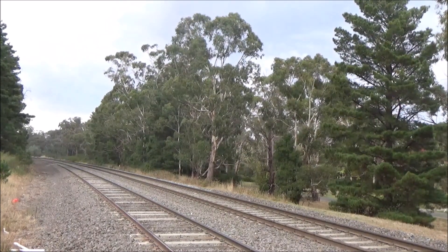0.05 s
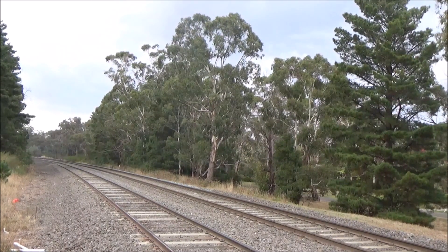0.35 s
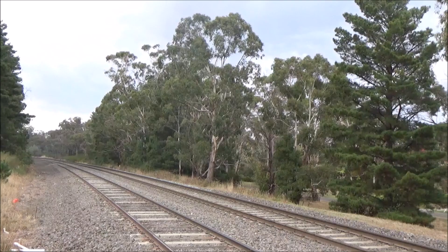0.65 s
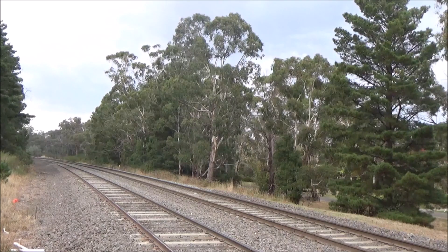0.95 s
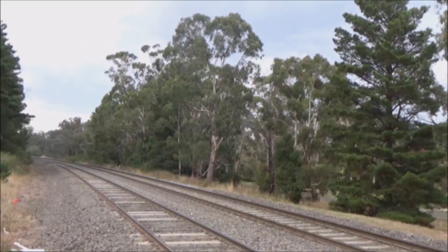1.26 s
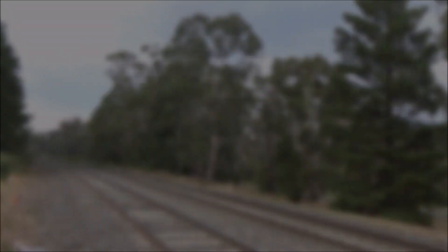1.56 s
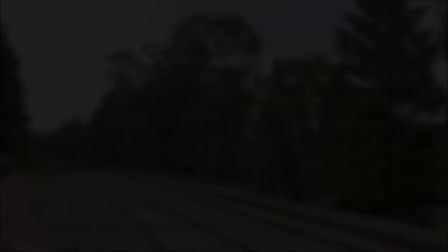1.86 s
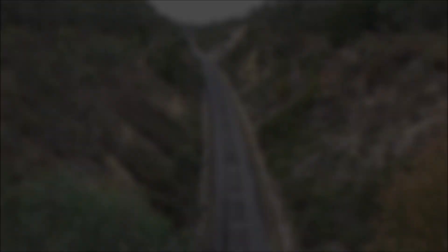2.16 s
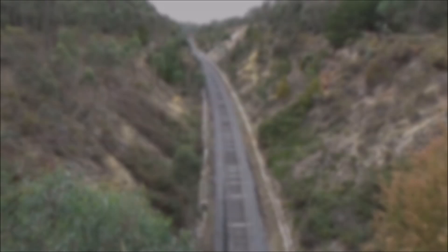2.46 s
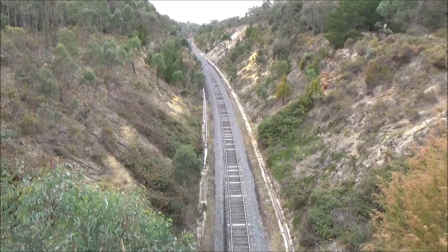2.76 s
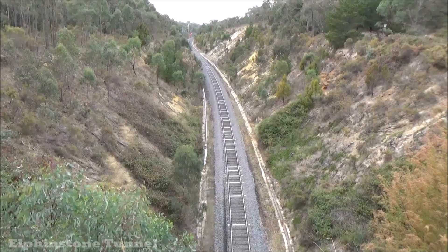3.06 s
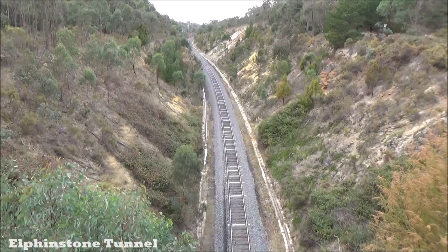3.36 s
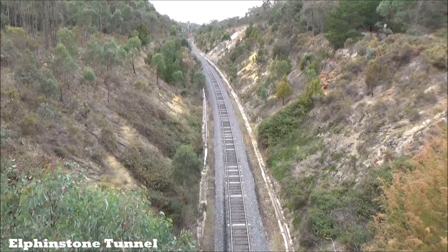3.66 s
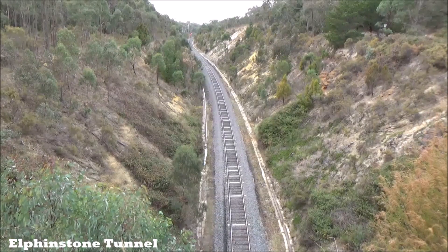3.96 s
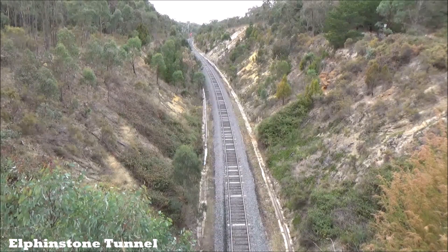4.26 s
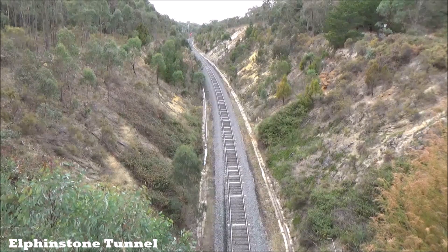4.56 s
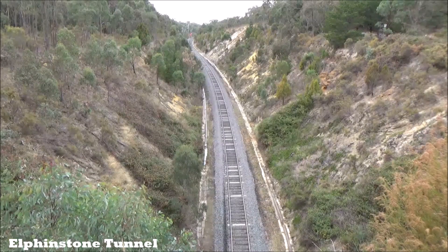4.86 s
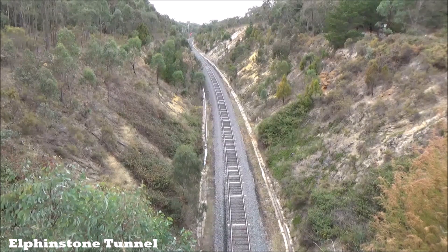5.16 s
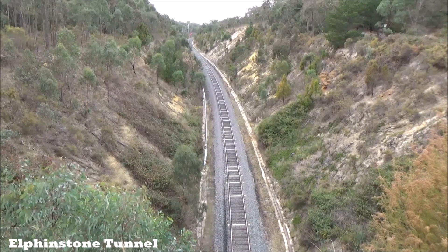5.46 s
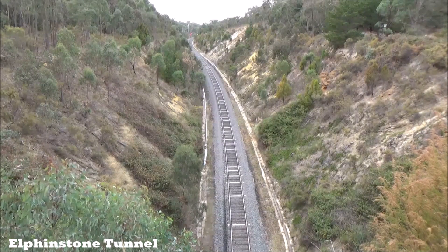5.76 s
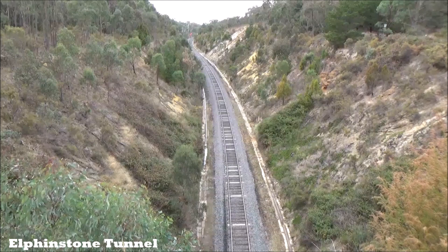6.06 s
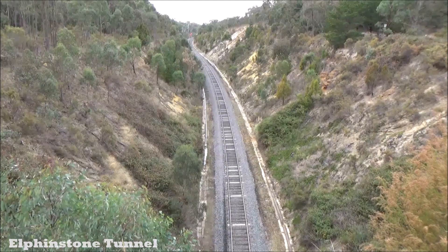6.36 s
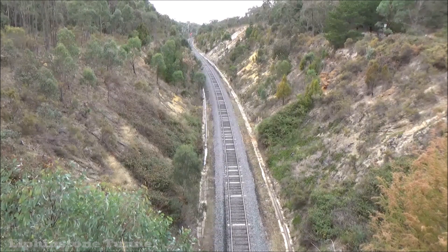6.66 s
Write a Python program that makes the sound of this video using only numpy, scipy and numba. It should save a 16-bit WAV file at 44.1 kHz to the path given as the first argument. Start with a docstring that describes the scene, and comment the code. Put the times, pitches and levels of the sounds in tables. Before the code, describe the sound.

Outdoors beside a railway, carriages rumble off to the right with a rough, pulsing wheel roar and short metallic squeals. They die away after about two seconds, and a falling rush leads into the quieter, quick chuffing of another steam engine, heard from ahead in a cutting. Its echoing beat grows nearer, then holds steady, with falling whines over it. A faint insect, rustling leaves and one thin bird trill lie behind.

```python
"""A steam train rolls away on the right, its rough wheels roaring and ringing under an even beat.
As it fades, a second locomotive works towards a bridge over a deep cutting: quick jets of steam from
the chimney ring hollow, echo off the slopes and are crossed by sinking whines.
Behind them a faint, thin note glides upwards, an insect rasps in the scrub, a small bird trills once
and leaves rustle in the open air."""
import sys
import numpy as np
from scipy import signal
from scipy.fft import rfft, irfft, next_fast_len
from scipy.io import wavfile
from scipy.ndimage import uniform_filter1d
from numba import njit

SR = 44100
rng = np.random.default_rng(int(sys.argv[2]) if len(sys.argv) > 2 else 0)


def int16_out(signal):
    """Quantize to a 16-bit WAV file."""
    q = np.round(np.clip(np.atleast_2d(signal).T, -1, 1) * 32767)
    wavfile.write(sys.argv[1], SR, q.astype(np.int16))


N = 300321
T = np.arange(N) / SR
NEAR_S = 4.58  # from here on the second train's wash and echo hold steady


# Fade of the departing train: time_s, roar_db, rumble_db
DEPARTURE_FADE = [(0, -19.5, -34), (.3, -21.5, -42.5), (.65, -23.5, -42.5), (.9, -23.5, -43.5),
                  (1.1, -25.5, -45.5), (1.36, -32, -50.5), (1.6, -31, -47.5), (1.87, -34.5, -55.5),
                  (2.2, -36.5, -53), (2.6, -37.5, -58)]
# Tone of wheels rolling on rail: freq_hz, gain_db
ROLLING_EQ = [(300, -42), (500, -15.5), (690, -0.6), (950, -10.5), (1100, -4.5), (1700, 1), (2400, -2),
              (3300, -11.5), (3950, -16), (4400, -22), (7000, -30.5), (8500, -38.5), (10500, -42),
              (12000, -77)]
# Ring of the wheels: pitch_hz, width_hz, gain_db
WHEEL_MODES = [(720, 25, -24), (860, 15, -5), (1070, 50, 11), (1550, 25, -17), (1686, 22, -21),
               (2430, 19, 4)]
def wheels(beat_hz=13.24, first_s=.027, steady_db=-4, beat_db=-9.5, beat_db_per_s=3):
    """Rough wheels roar and ring, surging on a beat that stands out more with distance; mid and side."""
    roar_db, _ = curve(DEPARTURE_FADE)
    t = np.arange(SR // 5) / SR - .02
    stroke = puff(t, length_s=.038, rise_s=.0027, fall_s=.038)
    beat_power = np.zeros(N)
    for start_s in np.arange(first_s, DEPARTURE_FADE[-1][0], 1 / beat_hz):
        add(beat_power, (undb(beat_db + beat_db_per_s * start_s) * stroke) ** 2, start_s + t[0])
    force = undb(roar_db) * np.sqrt(undb(steady_db) ** 2 + beat_power)
    roughness = flickering_noise(flicker_db=.8, rate_hz=26)
    contact = reflections(roughness, share_db=-13.5, spread_s=.04) * undb(.5 * walk(260))
    return (colour(contact, ROLLING_EQ) + undb(-21.5) * ring(contact, WHEEL_MODES)) * force


# Squeals of wheel on rail: peak_s, length_s, pitch_hz, glide_hz_per_s, waver_hz, level_db
SQUEALS = [(0.078, .11, 1520, 1500, 70, -34), (0.28, 0.15, 1946, 0, 110, -28),
           (.3, .16, 1665, -1100, 55, -24.5), (0.373, 0.055, 2580, 2996, 59, -31),
           (.44, 0.056, 2970, 1204, 50, -33.5), (0.537, 0.23, 3420, 1.5, 80, -39.5),
           (0.542, 0.39, 700, 0, 80, -37.5), (0.88, 0.16, 1850, -900, 70, -32.5),
           (1.0, .14, 1620, 0, 60, -33.5), (1.1, .14, 2170, -500, 40, -32),
           (1.27, .16, 2180, 400, 40, -32.5), (1.26, .12, 1923, 1, 70, -36), (1.5, .14, 3410, 400, 80, -51),
           (1.68, 0.15, 2735, -1500, 170, -42.5)]
def flanges(flutter_db=3):
    """Now and then a wheel rubs the rail and one of its modes sings roughly."""
    out = 0
    for peak_s, length_s, pitch_hz, glide_hz_per_s, waver_hz, level_db in SQUEALS:
        glide = glide_hz_per_s * np.clip(T - peak_s, -length_s, length_s)
        squeal = sine(pitch_hz + glide + waver_hz * walk(300)) * undb(flutter_db * walk(150))
        swell = np.exp(-np.minimum((2 * (T - peak_s) / length_s) ** 2, 50))
        out = out + unit(squeal) * swell * undb(level_db)
    return out


# Low body of the carriages: freq_hz, gain_db
RUMBLE_EQ = [(25, -39), (60, -18), (110, -11.5), (170, -1.5), (240, 1.5), (300, 4), (400, -3), (550, -5.5),
             (1000, -30.5)]
def carriages():
    """The carriages rumble and fade as they roll off; mid and side."""
    _, rumble_db = curve(DEPARTURE_FADE)
    return colour(rng.standard_normal((2, N)), RUMBLE_EQ) * undb(rumble_db + .95 * walk(18))


# Partials of a thin, high whine: pitch_hz, width_hz, gain_db
HIGH_WHINE_MODES = [(7150, 35, -1), (7400, 45, 0), (7492, 35, -2), (9320, 80, -3), (9470, 90, -3),
                    (9680, 80, -4), (10155, 50, -6)]
def high_whine(start_db=-59, fall_db_per_s=4):
    """A thin, high whine of fixed pitch that slowly fades."""
    whine = ring(rng.standard_normal(N), HIGH_WHINE_MODES)
    return whine * undb(start_db - fall_db_per_s * T + 1.2 * walk(14.5))


# Stereo width of the departing train: freq_hz, side_minus_mid_db
DEPARTURE_WIDTH = [(60, -5), (150, -6), (270, -11.5), (410, -4.5), (680, -14), (1130, -7), (2400, -11),
                   (4600, 0), (6300, -3), (9000, -7)]
# Its pan, mostly to the right: freq_hz, left_minus_right_db
DEPARTURE_PAN = [(200, 1), (350, -0.5), (600, -3), (1050, -7), (1900, -5.5), (3200, -6), (4600, -1),
                 (5800, -3), (7400, 4.5), (10300, 0)]
def departing_train():
    """Wheels, carriages and flanges blend into one train off to the right, under a thin, high whine."""
    mid, side = wheels() + carriages()
    train = stereo([mid + flanges() + high_whine(), equalise(side, DEPARTURE_WIDTH)], side_db=0)
    ear_share = np.array([[.5], [-.5]])
    return shape(train, lambda f: undb(across(DEPARTURE_PAN, f) * ear_share))


# Thuds of the running gear: start_s, level_db, pitch_hz, side_minus_mid_db
KNOCKS = [(0.005, -48, 105, -9), (0.135, -52, 105, -6), (0.218, -40, 150, -7), (0.81, -52, 135, -9),
          (1.655, -51, 190, -14), (2.042, -51, 155, -6), (2.345, -59, 100, -9), (3.424, -54, 180, -26)]
def knocks():
    """Heavy blows in the running gear reach the ear only as short low thuds."""
    out, t = np.zeros((2, N)), np.arange(SR // 2) / SR - .03
    blow = puff(t, length_s=.03, rise_s=.006, fall_s=.012)
    for start_s, level_db, pitch_hz, side_db in KNOCKS:
        thud = stereo(noise_band(len(t), pitch_hz, half_width_hz=50), side_db) * blow * undb(level_db)
        for ear, channel in zip(out, thud):
            add(ear, channel, start_s + t[0])
    return out


# Drive of the second engine's exhaust while far off: time_s, relative_level_db, brightness_db
FAR_EFFORT = [(2.38, -42.5, -3), (2.7, -44, -2), (3.05, -41, 1.5), (3.6, -41, -1), (3.9, -38.5, -7.5),
              (4.1, -40, -7)]
# Its chuffs once near: start_s, relative_level_db, brightness_db, bark_0_to_1
NEAR_CHUFFS = [(4.17, -39.8, -4.5, 0.9), (4.243, -38.5, -3.4, 0.2), (4.316, -38.6, -3.0, 0.2),
               (4.392, -36.8, -4.6, 0.2), (4.469, -38.0, -4.0, 0.2), (4.543, -34.2, -5.0, 0.7),
               (4.614, -34.5, -3.0, 0.2), (4.687, -37.0, -0.6, 0.2), (4.768, -35.1, -3.4, 0.2),
               (4.842, -33.2, -0.8, 0.9), (4.911, -35.4, -2.1, 0.8), (4.986, -35.4, -3.7, 0.2),
               (5.065, -35.3, 1.5, 0.5), (5.14, -33.0, 2.0, 0.9), (5.213, -35.9, 2.2, 0.2),
               (5.285, -35.6, -0.3, 0.2), (5.363, -34.6, 0.5, 0.8), (5.438, -35.6, 2.4, 0.2),
               (5.508, -37.6, 4.0, 0.2), (5.591, -36.6, 3.8, 0.2), (5.657, -36.5, 2.9, 0.2),
               (5.736, -37.3, 2.7, 0.2), (5.808, -35.0, 3.5, 0.8), (5.882, -37.8, 3.7, 0.2),
               (5.958, -36.6, 1.4, 0.2), (6.035, -35.5, 1.9, 0.2), (6.108, -38.1, 2.2, 0.2),
               (6.182, -38.3, 2.7, 0.2), (6.255, -36.9, -1.0, 0.2), (6.331, -36.6, 4.0, 0.5),
               (6.399, -36.8, 1.1, 0.2), (6.48, -36.9, 3.0, 0.2), (6.553, -36.8, 1.0, 0.2),
               (6.625, -37.4, 4.0, 0.2), (6.708, -38.5, 2.9, 0.2), (6.777, -38.5, 1.3, 0.9)]
def chuffs(t, beat_hz=13.425, first_s=2.381, scatter_s=.002, scatter_db=.9, crack_db=5, crack_s=.008):
    """The valve lets out steam on an even beat; yields start_s, steam flow over t, brightness_db."""
    time_s, effort_db, tint_db = np.transpose(FAR_EFFORT)
    far_chuffs = []
    for beat_s in np.arange(first_s, NEAR_CHUFFS[0][0] - .5 / beat_hz, 1 / beat_hz):
        start_s = beat_s + scatter_s * rng.standard_normal()
        level_db = np.interp(beat_s, time_s, effort_db) + scatter_db * rng.standard_normal()
        far_chuffs.append((start_s, level_db, np.interp(beat_s, time_s, tint_db), 0))
    for start_s, level_db, brightness_db, bark in far_chuffs + list(NEAR_CHUFFS):
        # a bark is shorter and snappier, and opens with a crack that dies at once
        flow = puff(t, length_s=.044 - .014 * bark, rise_s=.005 * .2 ** bark, fall_s=.02)
        overshoot_db = bark * crack_db * np.exp(-abs(t) / crack_s)
        yield start_s, flow * undb(level_db + overshoot_db), brightness_db


# Tone of the chimney blast: freq_hz, gain_db
BLAST_EQ = [(150, -35), (270, -23), (380, -2), (620, -11.5), (800, -1.5), (1450, 1.5), (2200, -2),
            (3300, -6), (4700, -15.5), (5800, -29.5), (8000, -64)]
# Stereo width of the cutting's echo: freq_hz, side_minus_mid_db
ECHO_WIDTH = [(150, -2), (390, -25), (560, -11), (1400, -6.5), (2300, -5), (5000, -7)]
def exhaust(crackle_db=.33, near_echo_db=-8.5, drying_db_per_s=2.5, trim_db=-4):
    """Each chuff is a ragged jet of steam that echoes off the slopes, drier as the engine nears."""
    jets, t = np.zeros(N), np.arange(SR // 5) / SR - .02
    for start_s, flow, brightness_db in chuffs(t):
        tone = lambda f: undb(across(BLAST_EQ, f) + brightness_db * np.clip(np.log2((f + 1) / 1600), 0, 1))
        steam = unit(shape(rng.standard_normal(len(t)), tone))
        add(jets, steam * flow, start_s + t[0])
    jets *= undb(crackle_db * walk(420) + walk(75))
    front, side = slope_echo(jets, t60_s=.7, build_s=.04)
    echo = stereo([front, equalise(side, ECHO_WIDTH)], side_db=0)
    wet = undb(near_echo_db + drying_db_per_s * np.maximum(NEAR_S - T, 0))
    direct = reflections(jets, share_db=-11, spread_s=.02)
    return undb(trim_db) * (direct + wet * echo) / np.sqrt(1 + wet ** 2)


# Tone of the second train's wash: freq_hz, gain_db
WASH_EQ = [(200, -22), (330, -5), (500, -5.5), (630, -1.5), (780, -2.5), (1500, 1.5), (2100, -3.5),
           (3100, -9.5), (4500, -18.5), (5700, -32), (9000, -33.5), (11000, -36.5)]
# Drone of its engine: pitch_hz, width_hz, gain_db
DRONE_MODES = [(58, 32, -12), (208, 67, -0.5), (326, 71, -4.5), (390.7, 39, 0.5), (486, 32, -6.5),
               (752, 41, -4), (855, 34, -4.5)]
def approaching_train(wash_rise_db_per_s=2.5, drone_fall_db_per_s=.4):
    """Wheels and old echoes merge to a wash that grows as the train nears; the engine drones low."""
    wash_db = -43.5 - wash_rise_db_per_s * np.maximum(NEAR_S - T, 0)
    drone_db = -51.5 - drone_fall_db_per_s * (T - NEAR_S)
    wash = stereo(colour(flickering_noise(flicker_db=1.2, rate_hz=9), WASH_EQ), side_db=-18)
    hum = ring(rng.standard_normal(N), DRONE_MODES)
    drone = colour(hum, [(30, -18), (60, -3.5), (800, 5), (1400, -17)])
    return wash * undb(wash_db) + drone * undb(drone_db + .33 * walk(12))


# Hollow ring of engine and cutting: pitch_hz, width_hz, lift_db
HOLLOW_MODES = [(385, 54, 0.5), (744, 55, 3), (840, 50, 3), (1060, 55, 2.5), (1164, 50, 1.5),
                (1520, 120, 1), (1900, 80, 2), (2830, 80, 3), (3110, 120, 2.5), (3470, 120, 1.5),
                (3920, 100, 2.5)]
def hollow(pair):
    """Engine and cutting lift the second train's roar at a row of fixed resonances."""
    def lift(f):
        return sum((undb(db) - 1) * resonance(f, hz, width) for hz, width, db in HOLLOW_MODES)
    return shape(pair, lambda f: 1 + lift(f))


# Sinking whines, one list of points each: time_s, pitch_hz, lift_db
WHINE_PATHS = [
    [(2.45, 4000, 4.5), (2.57, 3800, 4.5)],
    [(2.47, 1850, 6), (2.62, 1780, 6)],
    [(2.72, 3080, 4), (2.8, 2780, 6), (2.85, 2380, 6.5), (2.94, 1980, 3.5), (3.08, 1780, 4.5),
     (3.25, 1540, 4), (3.37, 1320, 6), (3.46, 1250, 2)],
    [(2.97, 3500, 4.5), (3.03, 3250, 4), (3.1, 2900, 4.5)],
    [(4.17, 1540, 3), (4.33, 1445, 7), (4.42, 1400, 2), (4.5, 1190, 1), (4.56, 1125, 5.5), (4.62, 1080, 1)],
    [(4.75, 1590, 4), (4.86, 1520, 4.5), (4.92, 1420, 7.5), (5.0, 1490, 8), (5.05, 1380, 3)],
    [(5.05, 2550, 6), (5.13, 1850, 3), (5.18, 1720, 3), (5.24, 1680, 8), (5.31, 1560, 4), (5.4, 1100, 3)],
    [(5.92, 2100, 3), (5.98, 2020, 6), (6.09, 1990, 7), (6.14, 1600, 6), (6.22, 1540, 4)],
    [(6.33, 2420, 3), (6.46, 2330, 4.5), (6.6, 2250, 1.5)],
]
def whines(pair, waver_share=.028, breakup=.45):
    """Dead centre, bands of the roar swell into hoarse whines, as when sound and reflection add up."""
    mid, out = pair.mean(axis=0), pair
    for path in WHINE_PATHS:
        path_hz, lift_db = curve(path)
        pitch_hz = path_hz * (1 + waver_share * walk(70))
        mean_hz = np.mean([point[1] for point in path])
        width_hz = 250 * (mean_hz / 1500) ** 1.5  # higher whines are wider
        sounding = (T > path[0][0]) & (T < path[-1][0])
        gate = uniform_filter1d(sounding.astype(float), SR // 40)
        broken = np.clip(1 + breakup * walk(30), 0, 1.3)
        band = sweep(sweep(mid, pitch_hz, width_hz), pitch_hz, width_hz)
        out = out + (undb(lift_db) - 1) * gate * broken * band
    return out


# Falling rush between the trains: time_s, centre_hz, level_db
SWISH_PATH = [(2.1, 1030, -55), (2.5, 1010, -48.5), (2.88, 850, -47.5), (3.1, 775, -48.5), (3.4, 670, -67),
              (4.2, 580, -100)]
def swish(width_hz=600.):
    """A hollow rush sinks in pitch as the second train comes into earshot."""
    centre_hz, level_db = curve(SWISH_PATH)
    rush = [unit(sweep(sweep(noise, centre_hz, width_hz), centre_hz, width_hz))
            for noise in rng.standard_normal((2, N))]
    return stereo(rush, side_db=-9.5) * undb(level_db)


def bird_trill(start_s=4.505, centre_hz=6740, swing_hz=240, warble_hz=37, gap_hz=680, level_db=-63):
    """A thin, quickly warbled trill from both sides of the syrinx, with its echo."""
    pitch_hz = centre_hz + swing_hz * np.sin(2 * np.pi * warble_hz * T) + 130 * walk(150)
    voices = sine(pitch_hz) + undb(-4) * sine(pitch_hz + gap_hz)
    breath = puff(T - start_s, length_s=.25, rise_s=.01, fall_s=.01)
    call = voices * breath * undb(level_db + 2.5 * walk(90))
    return call + undb(-6) * slope_echo(call, t60_s=.15, build_s=.005)


def rising_note(start_s=3.03, length_s=.27, start_hz=5750, glide_hz_per_s=4400, level_db=-71.5):
    """A faint, thin note glides upwards, wavering, with a short echo."""
    pitch_hz = start_hz + glide_hz_per_s * np.clip(T - start_s, 0, length_s) + 95 * walk(200)
    envelope = puff(T - start_s, length_s, rise_s=.01, fall_s=.01)
    note = sine(pitch_hz) * envelope * undb(level_db + 2.5 * walk(50))
    return note + undb(-8) * slope_echo(note, t60_s=.12, build_s=.005)


# Swells of the insect's song: time_s, level_db
INSECT_BOUTS = [(3.2, -78), (3.9, -70), (4.6, -82), (5.3, -73), (5.8, -71), (6.1, -75), (6.35, -72),
                (6.8, -72)]
def insect(pitch_hz=8170, stroke_hz=16):
    """Wing strokes rasp a narrow high resonance in uneven bouts."""
    wings = .5 + .5 * np.cos(2 * np.pi * stroke_hz * T + 1.3 * walk(5))
    strokes = .3 + .7 * wings ** 2
    rasp = stereo(noise_band(N, pitch_hz, half_width_hz=300), side_db=-13)
    bout_db, = curve(INSECT_BOUTS)
    return rasp * strokes * undb(bout_db + 1.5 * walk(14))


def tick(start_s=2.054, decay_s=.002, level_db=-49):
    """Something small snaps once, dry and close by."""
    t = T - start_s
    snap = colour(rng.standard_normal(N), [(3000, -20), (5500, -2), (8500, -3), (11000, -18)])
    return snap * (t >= 0) * np.exp(-abs(t) / decay_s) * undb(level_db)


# Bed of open air and foliage: freq_hz, gain_db
AIR_EQ = [(20, -26), (60, 0), (120, -5), (400, -5), (2000, -1), (6000, -2), (8300, -6), (10500, -10),
          (12000, -30)]
# Breeze in the near leaves: time_s, level_db
BREEZE = [(2.3, -74), (2.75, -67), (3.15, -67), (3.4, -73.5), (4.5, -73.5)]
def air(bed_db=-73):
    """Quiet open air; the rustle of the near leaves swells briefly in a breeze."""
    bed = stereo(colour(rng.standard_normal((2, N)), AIR_EQ), side_db=-.5) * undb(bed_db)
    leaves = colour(rng.standard_normal((2, N)), [(3000, -9), (6000, -6), (8500, -1.5), (10500, -17)])
    breeze_db, = curve(BREEZE)
    return bed + stereo(leaves, side_db=-3) * undb(breeze_db + 1.2 * walk(25.2))


def slope_echo(x, t60_s, build_s):
    """Rock and scrub scatter the sound into two independent echo tails."""
    t = np.arange(SR) / SR
    tails = rng.standard_normal((2, SR)) * undb(-60 * t / t60_s) * (1 - np.exp(-t / build_s))
    tails /= np.sqrt(np.sum(tails ** 2, axis=1, keepdims=True))
    return signal.fftconvolve(x[None], tails, axes=1)[:, :N]


def reflections(x, share_db, spread_s, count=24):
    """Early echoes from ground and trunks comb the sound finely."""
    lateness, polarity = rng.random((count, 2)).T
    delay_s = .003 + spread_s * lateness
    taps = np.zeros(SR // 4)
    taps[0] = 1
    taps[(delay_s * SR).astype(int)] = np.sign(polarity - .5) * undb(share_db) / np.sqrt(count)
    taps /= np.sqrt(np.sum(taps ** 2))
    return signal.fftconvolve(np.atleast_2d(x), taps[None], axes=1)[:, :N]


def puff(t, length_s, rise_s, fall_s):
    """Envelope that opens around t = 0, holds for most of its length and dies away."""
    return (1 + np.tanh(t / rise_s)) / 2 * np.exp(-np.maximum(t - .73 * length_s, 0) / fall_s)


def flickering_noise(flicker_db, rate_hz):
    """Mid and side noise whose half-octave bands flicker on their own."""
    size = next_fast_len(N, real=True)
    spectrum = rfft(rng.standard_normal((2, N)), size)
    freq_hz = np.arange(size // 2 + 1) * SR / size
    band_position = np.clip(2 * np.log2((freq_hz + 1) / 500), 0, 8)
    out = 0
    for k in range(9):
        band = irfft(spectrum * np.maximum(1 - abs(band_position - k), 0), size)[:, :N]
        out = out + band * undb(flicker_db * walk(rate_hz))
    return out


def noise_band(samples, centre_hz, half_width_hz):
    """Mid and side noise in one flat-topped band, at rms 1."""
    noise = rng.standard_normal((2, samples))
    return unit(shape(noise, lambda f: 1 / (1 + ((f - centre_hz) / half_width_hz) ** 4)))


def walk(rate_hz):
    """Random drift with a spread a little over 1."""
    knots = rng.standard_normal(4096)
    return 1.556 * np.interp(T * rate_hz, np.arange(len(knots)), knots)


def sine(pitch_hz):
    """A pure tone that follows a pitch curve."""
    return np.sin(2 * np.pi * np.cumsum(pitch_hz) / SR)


@njit
def sweep(x, centre_hz, width_hz):
    """Band-pass whose centre moves, gain 1 at the centre."""
    out, band_state, low_state = np.empty(len(x)), 0., 0.
    for i in range(len(x)):
        tuning, damping = np.tan(np.pi * centre_hz[i] / SR), width_hz / centre_hz[i]
        band = (band_state + tuning * (x[i] - low_state)) / (1 + tuning * (tuning + damping))
        band_state = 2 * band - band_state
        low_state += 2 * tuning * band
        out[i] = damping * band
    return out


def resonance(f, pitch_hz, width_hz):
    """Complex gain of one mode at frequencies f."""
    return 1 / (1 + 1j * (f - pitch_hz ** 2 / (f + 1)) / width_hz)


def ring(x, modes):
    """Pass x through resonances, at rms 1."""
    def gain(f):
        return sum(undb(db) / np.sqrt(width) * resonance(f, hz, width) for hz, width, db in modes)
    return unit(shape(x, gain))


def shape(x, gain):
    """Filter x by a gain that is a function of frequency."""
    size = next_fast_len(x.shape[-1] + 1024, real=True)
    freq_hz = np.arange(size // 2 + 1) * SR / size
    return irfft(rfft(x, size) * gain(freq_hz), size)[..., :x.shape[-1]]


def across(eq, f):
    """Read freq_hz, gain_db points on a log-frequency axis."""
    freq_hz, gain_db = np.transpose(eq)
    return np.interp(np.log(f + 1), np.log(freq_hz), gain_db)


def equalise(x, eq):
    """Filter x by an EQ curve."""
    return shape(x, lambda f: undb(across(eq, f)))


def colour(x, eq):
    """Equalise x and bring it to rms 1."""
    return unit(equalise(x, eq))


def curve(rows):
    """Each value column of a time table, sample by sample."""
    time_s, *columns = np.transpose(rows)
    return [np.interp(T, time_s, column) for column in columns]


def stereo(pair, side_db):
    """Mid and side to left and right."""
    return pair[0] + undb(side_db) * pair[1] * np.array([[1], [-1]])


def add(out, x, start_s):
    """Mix x into out from start_s, or from zero if that is later."""
    first = max(int(start_s * SR), 0)
    count = max(min(len(x), N - first), 0)
    out[first:first + count] += x[:count]


def undb(db):
    """Decibels to gain."""
    return 10 ** (np.asarray(db) / 20)


def unit(x):
    """Scale to rms 1."""
    return x / np.sqrt(np.mean(x ** 2) + 1e-20)


def scene(handover_s=2.27, blend_s=.31):
    """The first train gives way to the second in an equal-power crossfade."""
    turn = np.pi / 4 * (1 + np.tanh((T - handover_s) / blend_s))
    fade_out, fade_in = np.cos(turn), np.sin(turn)
    first_train = fade_out * departing_train()
    second_train = whines(hollow(fade_in * approaching_train() + exhaust()))
    railway = first_train + second_train + swish() + knocks()
    return railway + fade_in * insect() + bird_trill() + rising_note() + tick() + air()


def record(dry):
    """A steep low-pass takes off the very top."""
    top_hz = 10885
    return signal.sosfilt(signal.ellip(10, .2, 70, top_hz, fs=SR, output="sos"), dry)


dry = scene()
out = record(dry)
int16_out(out)
```